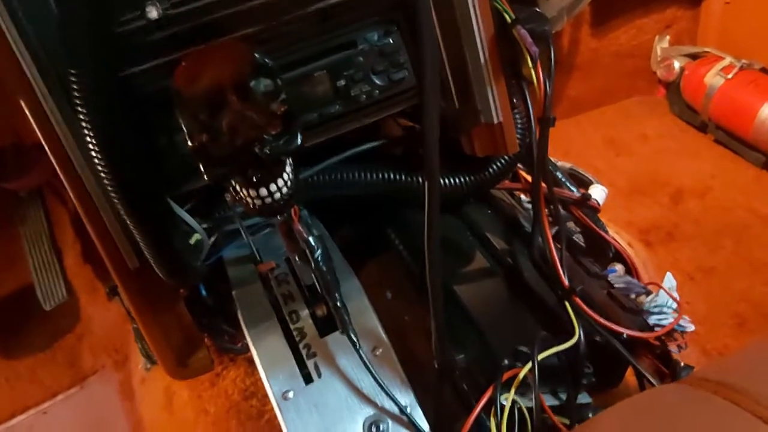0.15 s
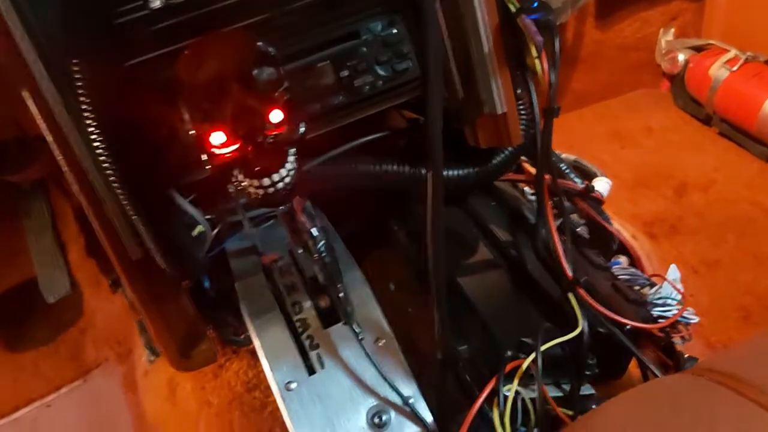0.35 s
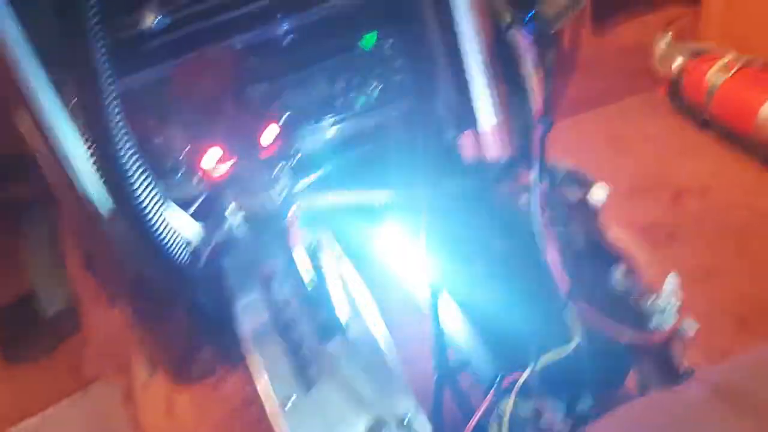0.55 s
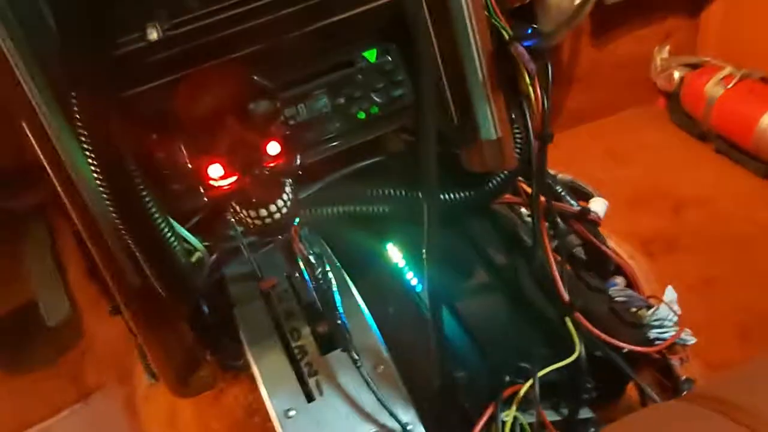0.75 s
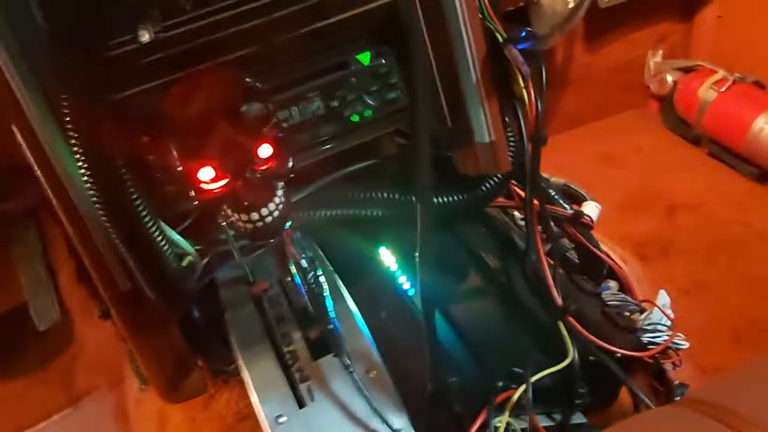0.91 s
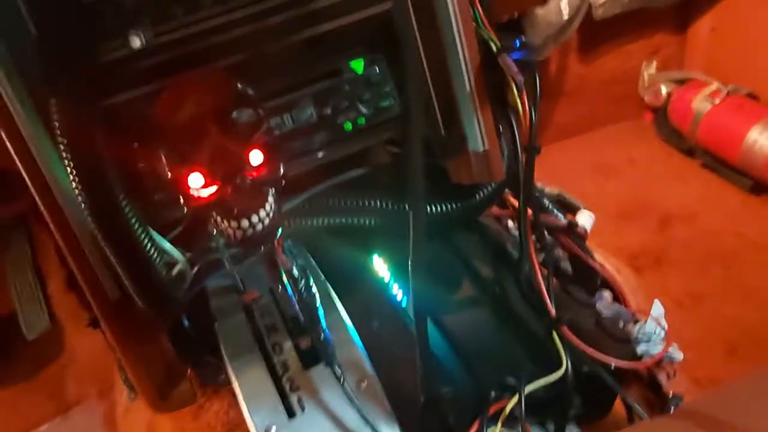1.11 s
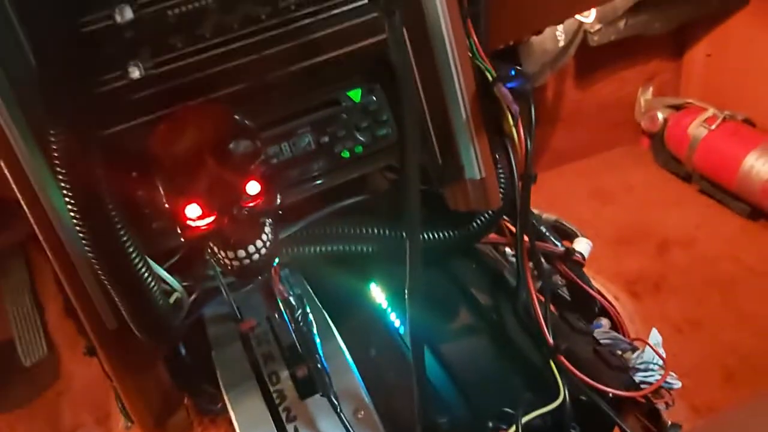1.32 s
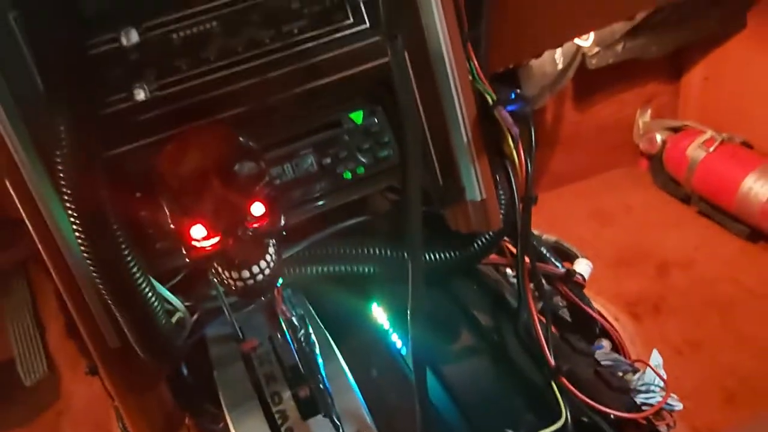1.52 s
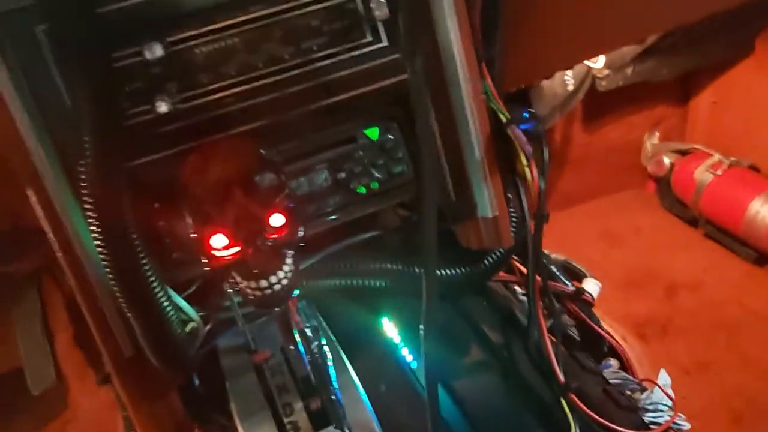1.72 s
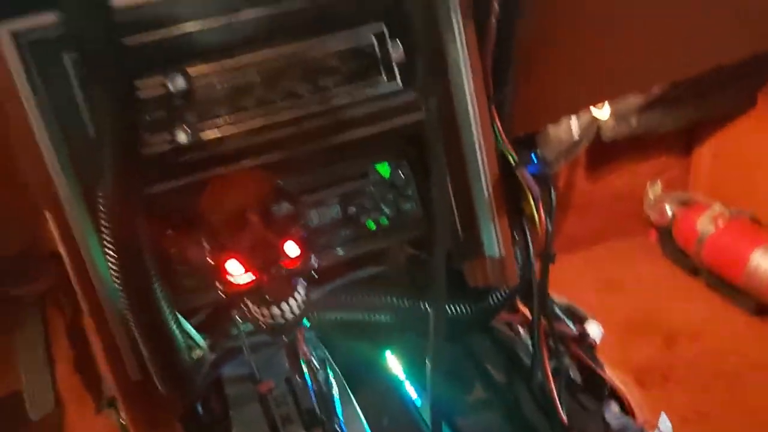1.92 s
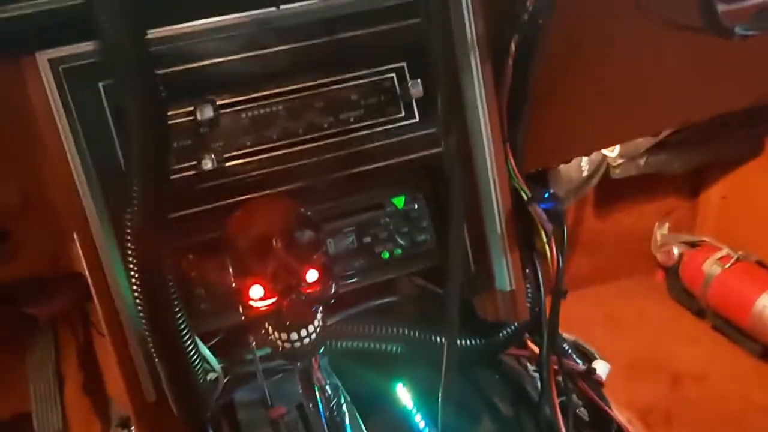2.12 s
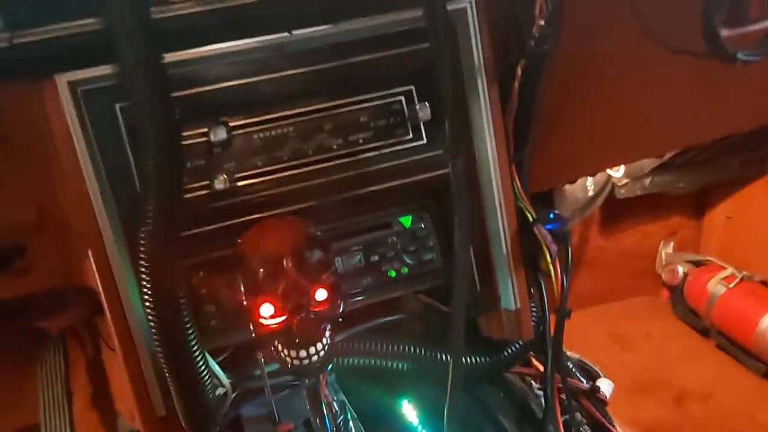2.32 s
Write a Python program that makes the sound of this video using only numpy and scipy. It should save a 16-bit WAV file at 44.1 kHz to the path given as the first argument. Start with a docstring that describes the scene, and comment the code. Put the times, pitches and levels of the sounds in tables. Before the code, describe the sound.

A fuel pump hums, heard from inside a car's cabin. It kicks in with a low thump after ignition clicks and a brief key jingle, then clicks off near the end with a loose rattle.

```python
"""An ignition key clicks round inside a parked car while the other keys clink on their ring.
A relay (an electric switch) closes and the fuel pump kicks in with a thump through the floor,
then hums, whines and hisses. A second, slower motor beats against its hum.
The relay opens and both motors start to run down, rattling loosely in their mounts.
A faint rumble and a distant hum lie under it all."""
import sys
import numpy as np
from scipy import signal
from scipy.fft import rfft, irfft, next_fast_len
from scipy.io import wavfile

SR = 44100
rng = np.random.default_rng(int(sys.argv[2]) if len(sys.argv) > 2 else 0)


def dump(signal):
    """Clip the signal to [-1, 1] and save it as 16-bit WAV at the path in sys.argv[1]."""
    limited = np.clip(np.atleast_2d(signal).T, -1, 1)
    pcm = np.round(limited * 32767).astype(np.int16)
    wavfile.write(sys.argv[1], SR, pcm)


N = 103723
T = np.arange(N) / SR
ON_S, OFF_S = .645, 2.17   # the motors get and lose their current
HUM_BALANCE_DB = [[-.7], [.7]]   # left, right
CUTOFF_HZ = 16000


# How fast the pump turns at full power: time_s, turns_per_s
PUMP_FULL_SPEED = [(.8, 39.8), (.95, 40.25), (1.4, 40.1), (1.85, 39.8), (2.15, 39.75)]
# The low tones of the pump's hum: cycles_per_turn, relative_db
PUMP_HUM_TONES = [(1, -18), (2, -7), (3, -6), (4, -3), (5, -15), (6, -8), (7, -4), (8, -7), (9, -2),
                  (10, -1), (11, -20), (12, -5.5), (13, -17), (14, -21), (18, -17), (19, -20), (20, -6.5),
                  (21, -11), (22, -23), (23, -23), (25, -21)]
# The high whine of its spinning electrical contacts: cycles_per_turn, level_db
PUMP_WHINE_TONES = [(30, -57.5), (40, -67), (41, -62.5), (45, -65), (50, -63.5), (55, -67), (58, -65),
                    (60, -65), (70, -61), (80, -61), (100, -65), (112, -66), (120, -64), (187, -68)]
# The hiss of fuel and of the brushes that rub on those contacts: pitch_hz, relative_db
PUMP_HISS_SPECTRUM = [(40, 14), (70, 11), (150, 6), (400, 0.5), (620, -1.5), (830, 4.5), (1050, -5),
                      (1400, -2.5), (1800, -7), (3300, -4), (4800, -2.5), (6000, -11.5), (7700, -6),
                      (9000, -18.5), (15500, -27.5)]

def fuel_pump():
    """The spinning pump hums, whines and hisses, then shudders in its mount as it slows."""
    running = run_share(spin_up_s=.03, coast_s=.55)
    speed = np.interp(T, *np.transpose(PUMP_FULL_SPEED)) * running * (1 + .0015 * drift(30))
    hum = from_db(-36.5) * unit_rms(shaft_tones(speed, PUMP_HUM_TONES, rough=.17))
    hum *= swell(ON_S, .17, 1.366, .17)
    shudder = shaft_tones(speed, [(10, -43.5)], rough=.4) * swell(2.205, .044, .031, .027)
    whine = shaft_tones(speed, PUMP_WHINE_TONES, rough=.4)
    whine *= swell(ON_S + .06, .08, OFF_S - ON_S - .14, .025)
    # While the power is on, part of the hiss repeats with every turn.
    one_turn = rng.standard_normal((2, SR // 40))
    place_in_turn = (np.cumsum(speed) / SR % 1 * one_turn.shape[1]).astype(int)
    repeat_share = .29 * (T < OFF_S)
    repeating = np.sqrt(repeat_share) * one_turn[:, place_in_turn]
    fresh = np.sqrt(1 - repeat_share) * rng.standard_normal((2, N))
    hiss = from_db(-45) * colour(repeating + fresh, PUMP_HISS_SPECTRUM)
    flow = run_share(spin_up_s=.058, coast_s=.095)
    rubbing = from_db(-15) * running   # goes on as long as the shaft turns
    return (hum + shudder) * from_db(HUM_BALANCE_DB) + whine + hiss * (flow + rubbing)


# The tones of the slower motor's hum: cycles_per_turn, relative_db
MOTOR_HUM_TONES = [(1, -6), (2, -9), (3, -4), (4, -8), (5, 0), (6, -10), (7, -18), (8, -19), (9, -11),
                   (10, -14), (11, -11), (12, -10), (13, -13), (14, -24), (15, -15), (16, -15), (18, -16),
                   (20, -24), (21, -24), (23, -22), (24, -24), (25, -22), (26, -19)]
# How loud that hum would be at full speed: time_s, level_db
MOTOR_FULL_LEVEL = [(.8, -36), (1.0, -36), (1.25, -34.5), (1.9, -34.2), (2.15, -33.5), (2.33, -37)]

def second_motor():
    """A heavier motor takes longer to speed up and slow down; its hum is weaker at low speed."""
    full_speed_hz = 31.72
    running = run_share(spin_up_s=.08, coast_s=.912)
    speed = full_speed_hz * running * (1 + .0016 * drift(22))
    hum = unit_rms(shaft_tones(speed, MOTOR_HUM_TONES, rough=.1))
    level = from_db(np.interp(T, *np.transpose(MOTOR_FULL_LEVEL))) * running ** 3.5
    return level * hum * from_db(HUM_BALANCE_DB)


# The notes the car's floor rings at when jolted: pitch_hz, level_db, decay_s
FLOOR_TONES = [(101, -22, 0.038), (134.3, -32.5, 0.086), (164.2, -34, 0.034)]
# The rasp of the brushes under the starting current: pitch_hz, relative_db
BRUSH_RASP_SPECTRUM = [(150, 0), (330, 16.5), (700, -2.5), (1300, -5), (1720, 5.5), (2300, 0.5), (3200, -4),
                       (4100, -2.5), (5500, -15), (9000, -21.5), (15000, -26)]

def start_jolt():
    """The starting kick thumps the floor, which quivers until the motors are up to speed; brushes rasp."""
    start_s, rise_s, hold_s = .6543, .045, .028
    thump = sum(from_db(db) * tone(hz * T, hz) * swell(start_s, rise_s, hold_s, decay_s)
                for hz, db, decay_s in FLOOR_TONES)
    quiver = from_db(-37) * noise([(60, -32), (85, -14), (105, -3.5), (140, -26), (1000, -75)])
    quiver *= swell(start_s, .1, .1257, .023)
    rasp = from_db(-34.5) * noise(BRUSH_RASP_SPECTRUM) * swell(start_s, rise_s, hold_s, .074)
    return thump + quiver + rasp


# Each lock or relay click: start_s, level_db, tilt_db_per_octave, decay_s, knock_relative_db
LOCK_AND_RELAY_CLICKS = [(0.2004, -50, -0.5, 0.0058, -37), (0.2656, -51.5, -1, 0.0021, -20),
                         (0.3678, -42.5, 0, 0.009, -3), (0.381, -36, 1, 0.0067, -9),
                         (.388, -41, -5.5, 0.0051, -26), (0.628, -36.5, -5, 0.042, -17),
                         (0.6372, -36.5, 5.5, 0.0078, -32), (0.8679, -36, 7.5, 0.0019, -25),
                         (2.138, -42.5, 3, 0.0064, -8), (2.142, -38, -2, 0.018, -2)]
# A sharp snap, also used for the keys' ticks and rustle: pitch_hz, relative_db
SNAP_SPECTRUM = [(150, 1.5), (400, -3), (850, 9), (1300, 4.5), (1900, 2.5), (3000, 5), (4300, 2.5),
                 (6000, -2.5), (8000, -4), (11000, -8.5), (15500, -11.5)]
# The hollow knock of the relay's case: pitch_hz, relative_db
KNOCK_SPECTRUM = [(1000, -20), (1700, -4), (2000, -7.5), (2280, -8), (2600, -8.5), (5000, -47)]

def lock_and_relay():
    """Each snap and knock dies quickly in the dashboard and leaves a short tail in the cabin."""
    knock = noise(KNOCK_SPECTRUM)
    out = np.zeros((2, N))
    for start_s, db, tilt_db, decay_s, knock_db in LOCK_AND_RELAY_CLICKS:
        click = noise(SNAP_SPECTRUM, tilt_db) + from_db(knock_db) * knock
        direct = swell(start_s, .0006, .00086, decay_s)
        cabin_tail = from_db(-14) * swell(start_s, .009, 0, .02)
        out += from_db(db) * click * (direct + cabin_tail)
    return out


# Each time the keys touch: start_s, strength_db, ping_relative_db
KEY_TOUCHES = [(0.411, -52, -1), (0.418, -43.5, 10.5), (0.427, -34.5, -5), (0.4716, -54, -20),
               (0.5777, -53, -27), (0.74, -44, -23)]
# The notes the keys ring at, and how long each takes to fade by 60 dB: pitch_hz, relative_db, ring_s
KEY_TONES = [(4344, -28, .25), (6180, -24, .05), (7224, -14, .09), (7620, -20, .08), (9750, -18, .09),
             (12900, -17, .04), (13700, -14, .04), (14150, -9, .05), (14590, -14, .08), (15330, -15, .05)]

def keys():
    """Each touch is a bright tick that sets the keys ringing; the bunch rustles as the key is turned."""
    ping_hz, ping_ring_s = 11450, .04
    decay_per_ring = 1 / np.log(1000)   # turns a 60 dB fade time into a decay time
    ticks = sum(from_db(db) * swell(start_s, .0004, 0, .007) for start_s, db, _ in KEY_TOUCHES)
    out = from_db(-3) * ticks * noise(SNAP_SPECTRUM, tilt_db=9)
    for hz, tone_db, ring_s in KEY_TONES:
        power = sum((from_db(db + rng.normal(0, 1.3)) * swell(s, .0027, 0, ring_s * decay_per_ring)) ** 2
                    for s, db, _ in KEY_TOUCHES)
        fluttering_tone = tone(hz * T + .11 * drift(300), hz) * (1 + .45 * drift(140))
        out += from_db(tone_db) * np.sqrt(power) * fluttering_tone
    pings = sum(from_db(db + ping_db) * swell(start_s, .0038, 0, ping_ring_s * decay_per_ring)
                for start_s, db, ping_db in KEY_TOUCHES)
    rustle = from_db(-68.5 + 2.5 * drift(62.3)) * noise(SNAP_SPECTRUM, tilt_db=-1)
    rustle *= swell(.19, .022, .46, .2)
    return out + pings * tone(ping_hz * T, ping_hz) + rustle


# The low rattle of the slowing motors: pitch_hz, relative_db
RATTLE_SPECTRUM = [(30, -12), (130, -1), (200, 4), (290, 1), (380, -9), (450, -7), (600, -5), (1000, -16.5),
                   (2000, -18), (6000, -39.5)]

def coast_rattle():
    """With the power off, the slowing motors rumble loosely in their mounts."""
    return from_db(-40.5) * noise(RATTLE_SPECTRUM) * swell(OFF_S, .02, .044, .19)


# The tones of a distant hum: pitch_hz, level_db
DISTANT_HUM_TONES = [(53.8, -52.5), (166.9, -57.5), (242.2, -58.5)]
# A low, steady rumble: pitch_hz, relative_db
RUMBLE_SPECTRUM = [(25, -30), (55, 0.5), (110, -10), (260, -5.5), (500, -16.5), (1000, -23.5),
                   (2000, -34.5), (5000, -50.5), (15000, -51.5)]

def background():
    """A faint rumble and a wavering hum go on throughout."""
    rumble = from_db(-52.5) * noise(RUMBLE_SPECTRUM)
    hum = sum(from_db(db) * tone(hz * T, hz) * (1 + .3 * drift(16)) for hz, db in DISTANT_HUM_TONES)
    return rumble + hum


def run_share(spin_up_s, coast_s):
    """Share of full speed, 0 to 1: it climbs when the power comes on and sinks when it goes off."""
    return (1 - np.exp(-since(ON_S) / spin_up_s)) * np.exp(-since(OFF_S) / coast_s)


def shaft_tones(speed, tones, rough):
    """A turning shaft makes tones at multiples of its speed; `rough` sets how much each one wavers."""
    turns = np.cumsum(speed) / SR
    out = np.zeros((2, N))
    for multiple, db in tones:
        cycles = round(multiple) * turns + rough * drift(20) / (2 * np.pi)
        out += from_db(db) * tone(cycles, multiple * speed.max()) * (1 + rough * drift(25.02))
    return out


# How alike the left and right sides sound (1 means the same): pitch_hz, likeness
STEREO_LIKENESS = [(60, .98), (250, .9), (700, .72), (2000, .55), (5000, .45), (8000, .35), (12000, .2)]

def colour(white, spectrum, tilt_db=0):
    """Shape two white noises into a partly alike stereo pair; tilt_db adds brightness per octave."""
    size = next_fast_len(N)
    hz = np.arange(size // 2 + 1) * SR / size
    gain = from_db(at_hz(spectrum, hz) + tilt_db * np.log2(hz + 1))
    mid, side = rfft(white, size) * gain * (hz > 20) * (hz < CUTOFF_HZ)
    alike = at_hz(STEREO_LIKENESS, hz)
    pair = np.sqrt(1 + alike) * mid + np.sqrt(1 - alike) * side * [[1], [-1]]
    return unit_rms(irfft(pair, size)[:, :N])


def tone(cycles, hz):
    """A pure tone; the cabin puts left and right out of step, more so for high notes."""
    spread_rad = .35 * np.arccos(at_hz(STEREO_LIKENESS, hz)) * rng.choice([-1, 1])
    return np.sqrt(2) * np.sin(2 * np.pi * (cycles + rng.random()) + spread_rad * np.array([[1], [-1]]))


def noise(spectrum, tilt_db=0):
    """Fresh stereo noise shaped by rows of pitch_hz, relative_db."""
    return colour(rng.standard_normal((2, N)), spectrum, tilt_db)


def swell(start_s, rise_s, hold_s, decay_s):
    """Rise in a straight line, hold, then fade to about a third every decay_s."""
    return np.clip(since(start_s) / rise_s, 0, 1) * np.exp(-since(start_s + rise_s + hold_s) / decay_s)


def drift(rate_hz):
    """A random wander around zero, roughly 1 in size."""
    points = rng.standard_normal(400)
    return np.interp(T * rate_hz, np.arange(len(points)), points)


def since(start_s):
    """Seconds since a moment, zero before it."""
    return np.maximum(T - start_s, 0)


def at_hz(table, hz):
    """Read between a table's rows, with octaves evenly spaced."""
    pitches, values = np.transpose(table)
    return np.interp(np.log(hz + 1e-9), np.log(pitches), values)


def from_db(db):
    """Turn decibels into a multiplier."""
    return 10 ** (np.asarray(db) / 20)


def unit_rms(x):
    """Scale a sound to an average power of 1."""
    return x / np.sqrt(np.mean(x ** 2) + 1e-20)


# How much later the sound reaches the right side: pitch_hz, delay_s
RIGHT_DELAY = [(100, .0004), (350, .00025), (850, .00025), (1200, .0002), (1800, .00045), (5000, .00048)]

def scene():
    """Add up all the sounds; everything reaches the right side a little later."""
    motors = fuel_pump() + second_motor() + coast_rattle() + start_jolt()
    left, right = motors + lock_and_relay() + keys() + background()
    size = next_fast_len(N + SR // 10)
    hz = np.arange(size // 2 + 1) * SR / size
    delay = np.exp(-2j * np.pi * hz * at_hz(RIGHT_DELAY, hz))
    return np.array([left, irfft(rfft(right, size) * delay, size)[:N]])


def record(dry):
    """Cut away the very highest treble."""
    return signal.sosfilt(signal.cheby2(16, 70, CUTOFF_HZ + 500, fs=SR, output="sos"), dry)


dry = scene()
out = record(dry)
dump(out)
```